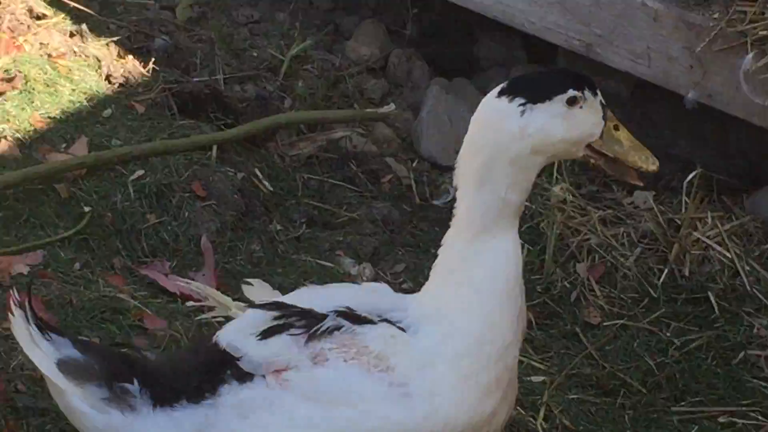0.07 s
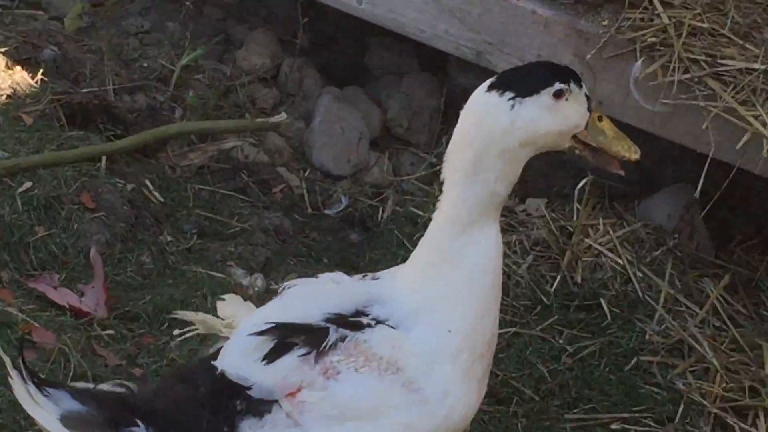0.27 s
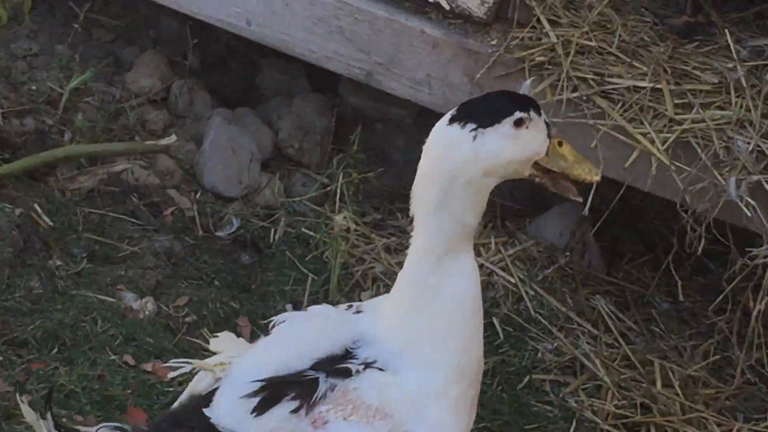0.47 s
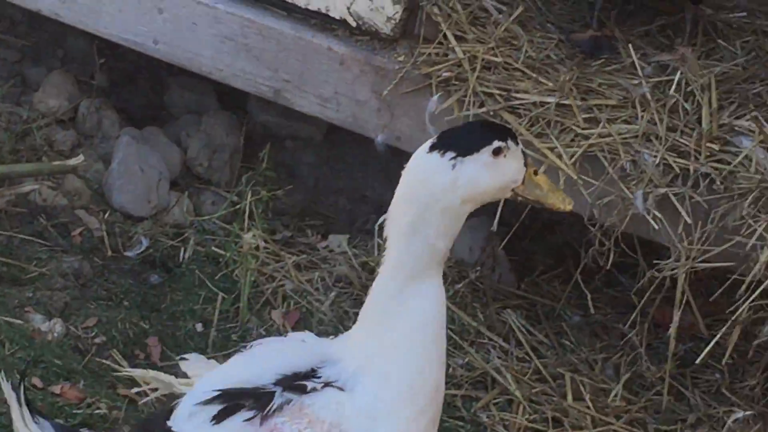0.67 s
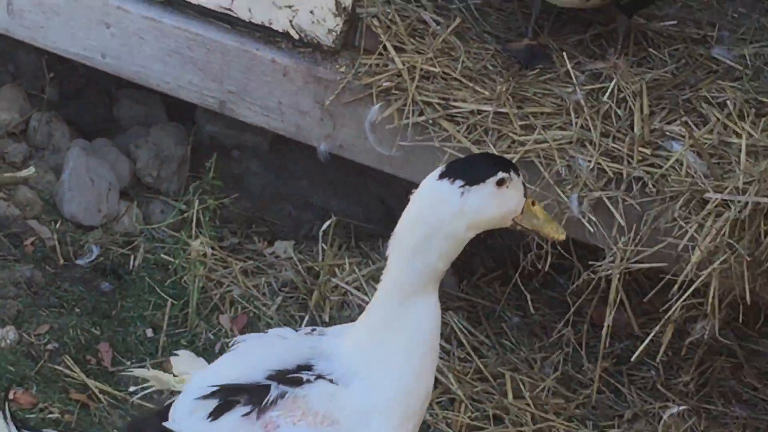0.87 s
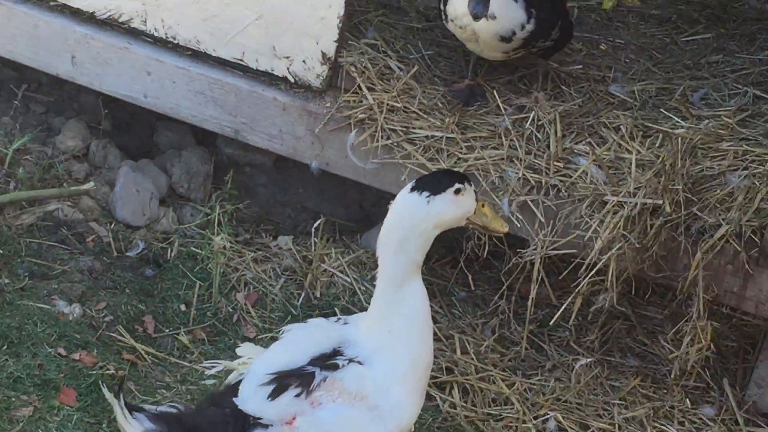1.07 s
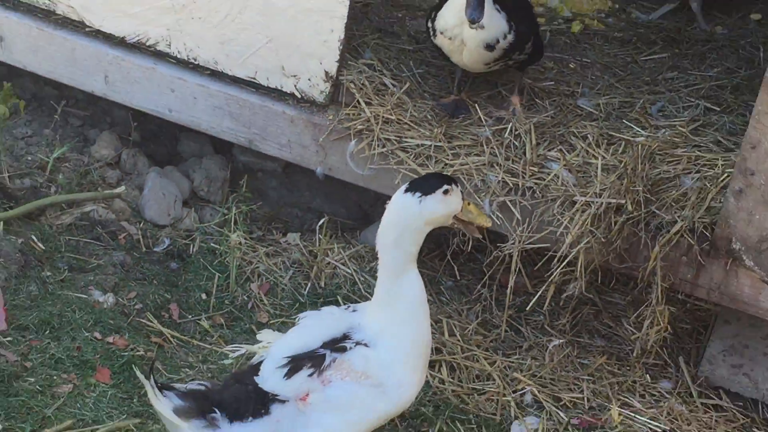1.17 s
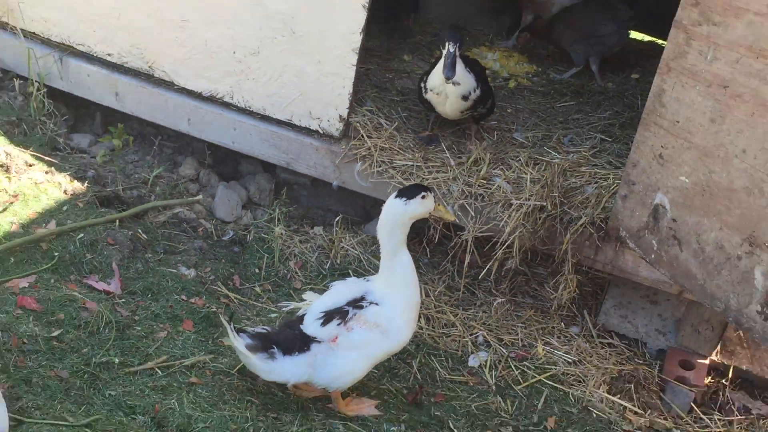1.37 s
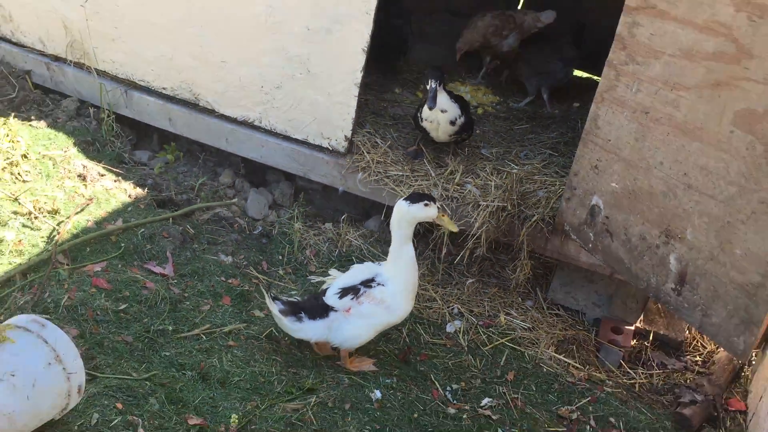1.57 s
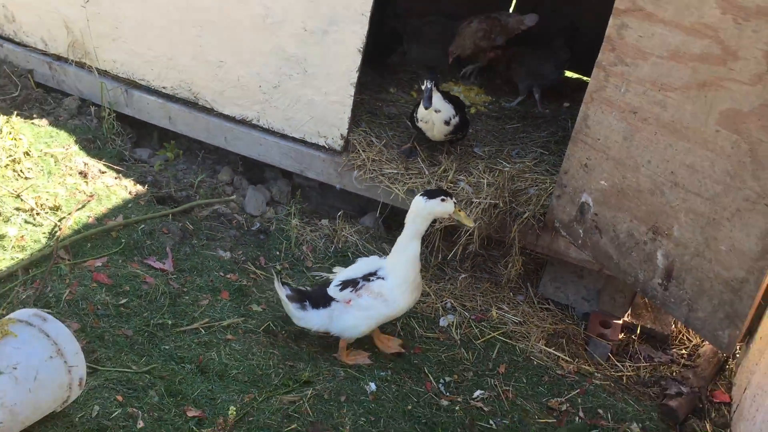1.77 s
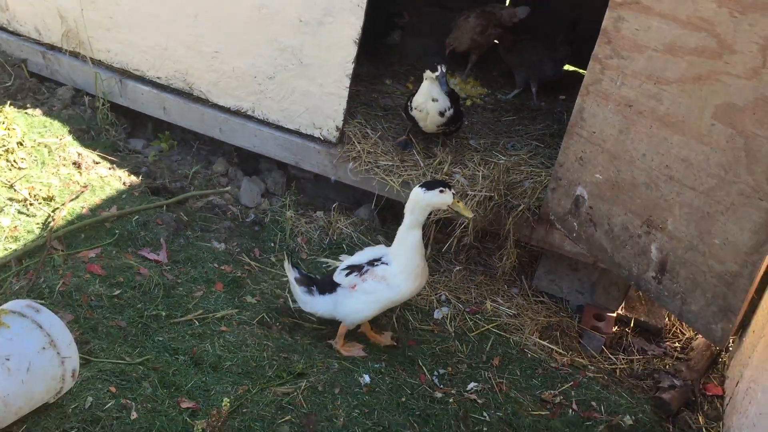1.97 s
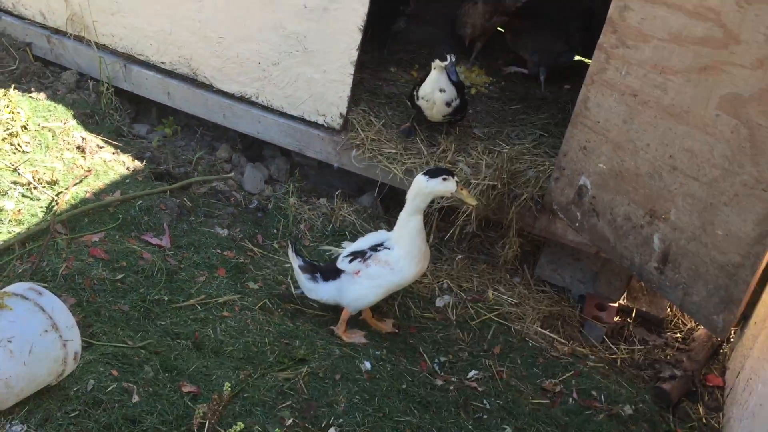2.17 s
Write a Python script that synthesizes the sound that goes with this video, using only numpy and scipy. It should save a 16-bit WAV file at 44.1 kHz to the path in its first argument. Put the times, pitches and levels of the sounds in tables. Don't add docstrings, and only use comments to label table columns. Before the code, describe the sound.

A duck quacks in quick, short, raspy calls close by in a breezy backyard.

```python
import sys
import numpy as np
from scipy import signal
from scipy.fft import rfft, irfft, next_fast_len
from scipy.io import wavfile
from scipy.ndimage import uniform_filter1d, map_coordinates

SR = 44100
rng = np.random.default_rng(int(sys.argv[2]) if len(sys.argv) > 2 else 0)


def amplitude_ratio(level_db):
    exponent = np.asarray(level_db, float) / 20
    return 10 ** exponent


def master(y):
    cut = np.clip(np.atleast_2d(y).T, -1, 1)
    pcm = np.round(cut * 32767)
    wavfile.write(sys.argv[1], SR, pcm.astype(np.int16))


N = 97505

# t/s, level/dB
WIND_LEVEL = [
    (0, -49),
    (.25, -49),
    (.5, -51),
    (1.2, -52),
    (1.7, -54),
    (1.85, -53),
    (2.1, -56),
    (2.21, -62),
]
# t/s, gain/dB
YARD_LULL = [
    (0, 1.5),
    (1.67, -0.5),
    (1.73, -4.5),
    (1.79, -6),
    (1.8, 3.5),
    (2.15, 1),
    (2.21, -8),
]
# f/Hz, density/dB
RUMBLE_SPECTRUM = [(25, -28), (55, -2), (100, 0), (170, -1), (270, -8), (340, -12), (400, -28), (600, -50)]
# f/Hz, density/dB
AIR_SPECTRUM = [(400, 9), (700, 10.5), (1000, 10), (1600, 9.5), (2500, 5), (5300, -3), (9300, -7.5),
                (15300, -30)]
# f/Hz, density/dB
THUMP_SPECTRUM = [(30, -20), (55, 0), (90, 0), (140, -10), (250, -40)]
# t/s, level/dB
STRAW_LEVEL = [(0, -57.5), (.08, -51.5), (.12, -74), (.18, -58), (.23, -73), (.41, -72), (.44, -62),
               (.48, -71), (.68, -71), (.7, -67), (.73, -78), (1.28, -70), (1.36, -60), (1.45, -56),
               (1.52, -78.5), (1.84, -77), (1.88, -55), (1.95, -65), (2, -81), (2.21, -81)]
# f/Hz, density/dB
STRAW_SPECTRUM = [(1500, -39), (3000, 2), (8000, 0.5), (13000, -0.5), (15200, 3.5), (15900, -44.5)]
# f/Hz, t60/s
SHED_T60 = [(200, 0.11), (600, 0.12), (1800, 0.11), (5000, 0.062), (12000, 0.13)]
# t/s, f/Hz, level/dB
GLIDING_WHINES = [
    [(.09, 1356, -64), (.103, 1633, -36.5), (.116, 1755, -33), (.13, 1900, -43.5), (.156, 2047, -29.5),
     (.168, 1994, -36), (.178, 1456, -42), (.2, 1310, -53)],
    [(.11, 1140, -71), (.122, 1170, -46), (.14, 1133, -36.5), (.158, 1230, -45), (.168, 1245, -84)],
    [(.61, 2170, -34.5), (.652, 2075, -48), (.665, 2020, -57.5)],
    [(1.28, 1880, -24), (1.3, 1950, -33), (1.315, 1720, -39), (1.33, 1480, -36), (1.345, 1300, -42)],
    [(.333, 1350, -48), (.343, 1300, -37.5), (.355, 1127, -31), (.362, 1100, -45)],
    [(1.558, 1150, -44.5), (1.568, 1055, -37), (1.578, 950, -39)],
    [(1.805, 212, -46), (1.815, 298, -39.5), (1.828, 280, -53)],
    [(2.065, 975, -54), (2.078, 1020, -43), (2.09, 1000, -55.5)],
    [(.41, 1608, -26), (.422, 1666, -32), (.432, 1875, -44), (.445, 1820, -34.5), (.455, 1740, -51)],
    [(1.885, 1550, -49), (1.902, 1680, -44), (1.93, 1566, -38)],
    [(1.926, 1914, -56), (1.937, 1965, -29.5), (1.952, 1725, -39)],
    [(1.93, 1120, -50), (1.943, 1057, -30), (1.956, 1053, -37.5)],
    [(2.07, 1350, -51), (2.086, 1434, -38), (2.104, 1932, -39), (2.12, 1907, -31), (2.135, 1850, -38),
     (2.15, 1297, -53), (2.168, 1030, -57)],
]
# f/Hz, density/dB
WHINE_BREATH = [(2200, -5), (3000, -15), (4200, -13.5), (8000, -28), (10000, -41.5)]
# start t/s, length/s, level/dB
BUZZES = [(-.03, 0.062, -14), (0.214, 0.026, -17.5), (0.361, 0.039, -14.5), (0.559, 0.036, -20),
          (0.718, 0.039, -12.5), (0.9, 0.037, -23), (1.076, 0.039, -16), (1.245, 0.027, -17),
          (1.418, 0.042, -18.5), (1.583, 0.048, -18), (1.843, 0.039, -21), (1.962, 0.053, -17.5)]
# puff t/s, puff/dB, main resonance f/Hz, throat/dB, brightness/dB
BILLS = [(-.05, -24, 1407, 1, -5.5), (0.18, -31, 1552, 4.5, -9), (0.331, -39.5, 1535, -2, -3.5),
         (0.535, -38, 1494, 3.5, -3), (0.69, -35.5, 1570, -5, -5), (0.877, -47, 1604, 6.5, -6),
         (1.038, -37.5, 1629, 1, -6), (1.227, -32, 1632, -1.5, -9.5), (1.396, -32, 1613, 0.5, -6.5),
         (1.565, -30, 1570, -1, -5), (1.8, -37, 1580, 7, -9.5), (1.923, -47, 1607, 0.5, -4.5)]
# murmur before the buzz/dB, rise/s, droop/dB
EFFORTS = [(-42, .008, 11.5), (-33.5, 0.0029, 5.5), (-43, 0.0027, 5.5), (-31.5, 0.0033, 6), (-42, 0.002, 6),
           (-35, 0.015, 3.5), (-58.5, 0.0025, 3.5), (-32, 0.0087, 2.5), (-30.5, 0.0105, 4.5),
           (-36, 0.0044, 4), (-34, 0.00464, 15), (-62, 0.015, 3)]
SECOND_LIFT_DB = [1.5, -4, 0.5, -0.5, -2.5, -7, -2.5, -9.5, -8, -3.5, -2, -4.5]
# t/s, f/Hz
GLIDES = [
    [(-.03, 266.5), (.03, 265), (.05, 233)],
    [(.19, 227.1), (.22, 251.7), (.25, 223.8)],
    [(.35, 287), (.373, 291.7), (.393, 278.9), (.412, 239)],
    [(.535, 211), (.55, 231.3), (.564, 252.6), (.58, 250.2), (.6, 208.9)],
    [(.7, 256), (.715, 271), (.734, 277.3), (.754, 270.8), (.772, 229.2)],
    [(.877, 226), (.89, 235.5), (.912, 267), (.922, 261), (.938, 253.4), (.955, 223.4)],
    [(1.06, 293.4), (1.075, 308.7), (1.096, 317.2), (1.114, 289.1), (1.13, 248)],
    [(1.227, 232), (1.238, 232), (1.258, 273.6), (1.276, 263.3), (1.29, 255)],
    [(1.396, 230), (1.408, 230.8), (1.428, 261.8), (1.442, 264.8), (1.452, 250), (1.472, 208.6)],
    [(1.565, 265), (1.586, 271.9), (1.608, 280.3), (1.628, 239), (1.645, 205)],
    [(1.8, 237.3), (1.825, 195), (1.84, 221.1), (1.856, 217.3), (1.872, 190.2), (1.89, 175.3)],
    [(1.94, 213), (1.957, 239.6), (1.989, 260.8), (2.003, 246.5), (2.025, 201), (2.04, 199)],
]
ROUGHNESS = [.35, .6, .22, .3, .12, .12, .2, .15, .18, .3, .4, .2]
# chest/dB, valley depth/0-1 (below 0 = filled)
COLOURS = [(4.5, 0.12), (1.5, .4), (0.5, -0.62), (0, 0.16), (-1, -0.67), (3.5, 0.66), (-1, -0.051),
           (-2, 0.11), (-1, 0.42), (1.5, -0.51), (4.5, -0.091), (0, -0.13)]
# f/Hz, width/Hz, level/dB
THROAT_MODES = [(270, 160, -14.5), (770, 150, -12)]
# f/Hz, width/Hz, level/dB
WINDPIPE_MODES = [(3166, 643, -10), (3807, 640, -10), (4480, 377, -6), (5310, 640, -10), (6026, 560, -10),
                  (6830, 540, -16.5), (7860, 2050, -20), (10200, 1700, -37.5), (11860, 930, -42),
                  (14200, 2100, -39.5)]

SHED_DB = -8.5


def unit(x):
    return x / np.sqrt(np.mean(x ** 2) + 1e-20)


def along(points, hz):
    f, v = np.transpose(points)
    return np.interp(np.log(hz + 1), np.log(f + 1), v)


def wobble(rate_hz, size=N):
    knots = rng.standard_normal(int(size * 2000 / SR) + 4)
    return map_coordinates(knots, [np.arange(size) * rate_hz / SR])


def filtered(x, response):
    m = next_fast_len(len(x) + SR // 4)
    return irfft(rfft(x, m) * response(np.fft.rfftfreq(m, 1 / SR)), m)[:len(x)]


def lowpass(x, hz, order):
    return filtered(x, lambda f: 1 / (1 + (f / hz) ** order))


def second_order(f, hz):
    return 1 + 1j * f / hz - (f / hz) ** 2


def resonances(rows):
    return lambda f: sum((-1) ** k * amplitude_ratio(db) * 1j * f * w / (c * c - f * f + 1j * f * w)
                         for k, (c, w, db) in enumerate(rows))


def noise(spectrum):
    points = [(5, -120)] + list(spectrum)
    return unit(filtered(rng.standard_normal(N), lambda hz: amplitude_ratio(along(points, hz))))


def yard():
    t = np.arange(N) / SR
    rumble = noise(RUMBLE_SPECTRUM) * amplitude_ratio(np.interp(t, *np.transpose(WIND_LEVEL)) + wobble(12))
    air = noise([(200, -51)] + list(AIR_SPECTRUM)) * amplitude_ratio(-59 + 0.4 * wobble(10.9))
    lull = amplitude_ratio(np.interp(t, *np.transpose(YARD_LULL)))

    thump_s, thump_length_s, thump_db = 0.135, 0.05, -41
    thump = noise(THUMP_SPECTRUM) * amplitude_ratio(thump_db) * np.exp(-((t - thump_s) / thump_length_s) ** 2)

    crackle = unit(noise(STRAW_SPECTRUM) * amplitude_ratio(1.5 * wobble(180)))
    straw = crackle * amplitude_ratio(np.interp(t, *np.transpose(STRAW_LEVEL)))
    return (rumble + air) * lull + thump + straw


def shed(x):
    delay_s = 0.0022
    hz, t, z = signal.stft(rng.standard_normal(SR // 2), SR, nperseg=256)
    decay = amplitude_ratio(-60 * t / along(SHED_T60, hz)[:, None])
    tail = signal.istft(z * decay, SR, nperseg=256)[1]
    late = np.pad(x, (round(delay_s * SR), 0))
    return signal.fftconvolve(late, tail / np.linalg.norm(tail))[:len(x)]


def gliding_whines():
    waver, hoarse_db, hoarse_width_hz, breath_db, ease_samples = 0.014, -1, 500, -16, 220
    t, out = np.arange(N) / SR, np.zeros(N)
    for rows in GLIDING_WHINES:
        s, hz, db = np.transpose(rows)
        pitch = np.interp(t, s, hz) * (1 + waver * wobble(120))
        phase = 2 * np.pi * np.cumsum(pitch) / SR
        hoarse = 1 + amplitude_ratio(hoarse_db) * wobble(hoarse_width_hz)
        level = uniform_filter1d(amplitude_ratio(np.interp(t, s, db, -120, -120)), ease_samples)
        out += level * (hoarse * np.sin(phase) + amplitude_ratio(breath_db) * noise(WHINE_BREATH))
    return out


def syrinx_pulses(pitch, cycles, rough):
    shimmer_db, even_below_hz, pulse_top_hz = 6, 1300, 5000
    size = len(pitch)
    at = np.interp(np.arange(np.ceil(cycles[0]), cycles[-1] - 1), cycles, np.arange(size))
    taps = np.floor(at).astype(int)[:, None] + np.arange(-7, 9)
    offset = taps - at[:, None]
    kernel = np.sinc(offset) * np.cos(offset * np.pi / 18) ** 2
    sizes = amplitude_ratio(shimmer_db * rough * rng.standard_normal(size // 64)[:len(at), None])
    where = np.clip(taps, 0, size - 1).ravel()
    pulses = np.bincount(where, (sizes * kernel).ravel(), size)
    even = np.bincount(where, kernel.ravel(), size)
    pulses += lowpass(even - pulses, even_below_hz, 6)
    return lowpass(pulses, pulse_top_hz, 4)


def gated_air(cycles):
    gate, low_hz = 0.83, 410
    air = rng.standard_normal(len(cycles)) * np.exp(-gate * (cycles % 1))
    return filtered(air, lambda f: (1j * f / (low_hz + 1j * f)) ** 2)


def windpipe(lift_db):
    spread_s, scatter_db = 0.005, 2
    late = spread_s * rng.random(len(WINDPIPE_MODES))
    patch_db = scatter_db * rng.standard_normal(len(WINDPIPE_MODES))
    return lambda f: sum(amplitude_ratio(db + lift_db + p) * resonances([(c, w, 0)])(f) ** 2 * np.exp(-2j * np.pi * f * s)
                         for (c, w, db), s, p in zip(WINDPIPE_MODES, late, patch_db))


def vocal_tract(main_hz, throat_db, bright_db, second_db, colour):
    bill_top_hz, top_hz = 2750, 9300
    chest_db, valley_depth = colour
    (chest_hz, chest_width, chest_level), (throat_hz, throat_width, throat_level) = THROAT_MODES
    upper = windpipe(bright_db)
    gap = resonances([(427.6, 150, 0)])
    valley = resonances([(1100, 280, 0)])

    def tract(f, ratio=1):
        pipe = resonances([(chest_hz, chest_width, chest_level + chest_db),
                           (throat_hz * ratio, throat_width, throat_level + throat_db),
                           (main_hz * ratio, 79.7, 0),
                           (main_hz * 1.429, 450, -10 + second_db)])
        body = pipe(f) / second_order(f, bill_top_hz) ** 2 + upper(f)
        return body * (1 - gap(f)) * (1 - valley_depth * valley(f)) / second_order(f, top_hz)
    return tract


def quack(call, bill, effort, second_db, glide, rough, colour):
    jitter, buzz_fall_s = 0.03, 0.016
    swell_from_db, swell_s, puff_fade_db_per_s = -9.5, 0.0085, 194
    hiss_above_hz, hiss_least, rasp_db, rasp_fall_db_per_s = 2600, 0.45, -3, 601
    dull_hz, dull_s, shut_ratio = 2800, 0.0022, 0.9117
    start, length, level_db = call
    puff, puff_db, main_hz, throat_db, bright_db = bill
    murmur_db, rise, fade_db = effort
    size = SR // 4
    t = np.arange(size) / SR + puff - start
    u = 2 * t / length - 1
    after = np.clip(t - length, 0, None)

    pitch = np.interp(t + start, *np.transpose(glide)) * (1 + jitter * rough * wobble(150.7, size))
    cycles = np.cumsum(pitch) / SR
    cycles = cycles - np.interp(0, t, cycles)
    pulses = syrinx_pulses(pitch, cycles, rough)
    air = gated_air(cycles)
    tract = vocal_tract(main_hz, throat_db, bright_db, second_db, colour)

    droop_db = level_db - fade_db * np.clip(t / length, 0, 1) ** 2
    attack = np.clip(t / rise + 0.23, 0, 1)
    release = np.clip(1 - (t - length) / buzz_fall_s, 0, 1) ** 2
    buzz = attack * release * amplitude_ratio(droop_db) + amplitude_ratio(murmur_db) * (t < rise)

    onset_db = droop_db + swell_from_db * np.clip(-t / swell_s, 0, None)
    opening_db = np.where(t < 0, puff_db - puff_fade_db_per_s * (t - t[0]), -120)
    swell_db = np.maximum(onset_db, opening_db)
    rasp = amplitude_ratio(swell_db + rasp_db - rasp_fall_db_per_s * after)

    edges = np.clip(np.abs(u) ** 2, rough, 1)
    hiss = filtered(air, lambda f: 1 / (1 + (hiss_above_hz / (f + 1)) ** 6))
    shaped_air = (air - hiss) * edges + hiss * np.maximum(edges, hiss_least)

    def scale(x):
        return np.sqrt(np.mean(filtered(x, tract) ** 2))
    source = pulses / scale(pulses) * buzz * np.sqrt(1 - np.clip(rough, 0, 0.95))
    source = source + shaped_air / scale(air) * rasp

    dull = lowpass(source, dull_hz, 6)
    source = dull + (source - dull) * np.exp(-after / dull_s)
    shut = np.clip(np.abs(u) - 0.7, 0, 1) * np.pi / 2
    opened = filtered(source * np.cos(shut), tract)
    return opened + filtered(source * np.sin(shut), lambda f: tract(f, shut_ratio))


def duck():
    out = np.zeros(N + SR)
    lead = SR // 4
    for call, bill, *manner in zip(BUZZES, BILLS, EFFORTS, SECOND_LIFT_DB, GLIDES, ROUGHNESS, COLOURS):
        sound = np.pad(quack(call, bill, *manner), (0, SR // 4))
        first = lead + round(bill[0] * SR)
        out[first:][:len(sound)] += sound + amplitude_ratio(SHED_DB) * shed(sound)
    return out[lead:][:N]


def scene():
    whines = gliding_whines()
    return (yard() + whines + amplitude_ratio(SHED_DB) * shed(whines) + duck())[None]


def top_cut(x):
    return signal.sosfilt(signal.butter(12, 15690, fs=SR, output="sos"), x)


def record(dry):
    ceiling = 0.9
    soft = dry / np.cbrt(1 + np.abs(dry / ceiling) ** 3)
    return top_cut(soft)


dry = scene()
out = record(dry)
master(out)
```